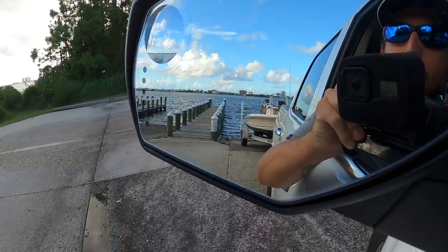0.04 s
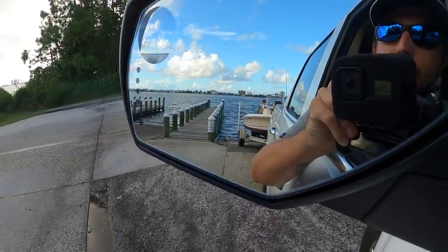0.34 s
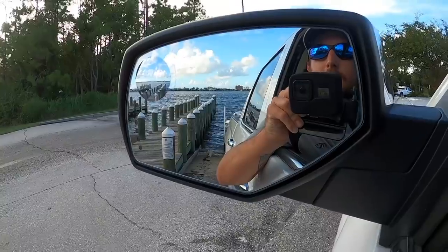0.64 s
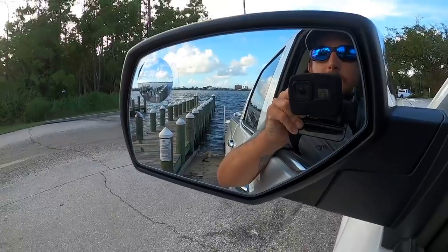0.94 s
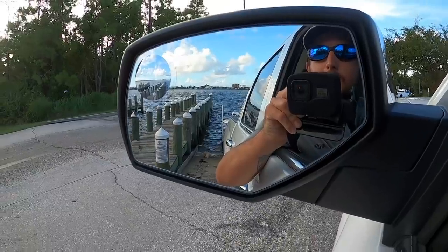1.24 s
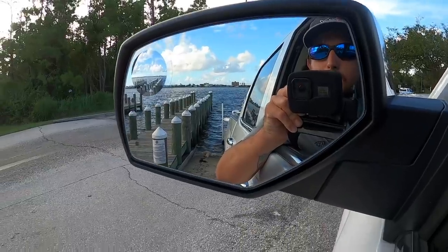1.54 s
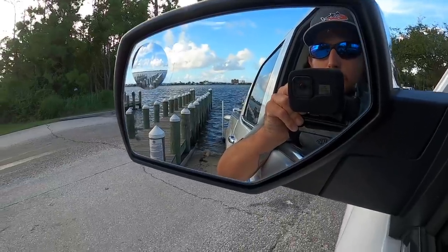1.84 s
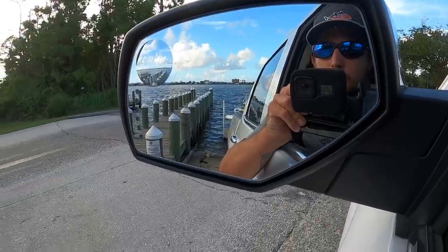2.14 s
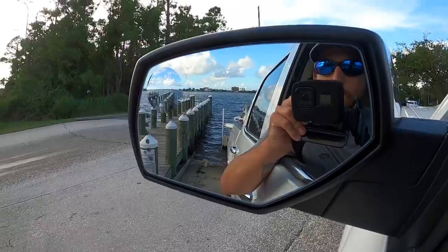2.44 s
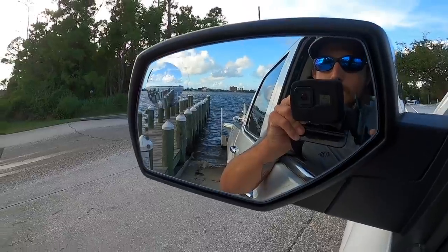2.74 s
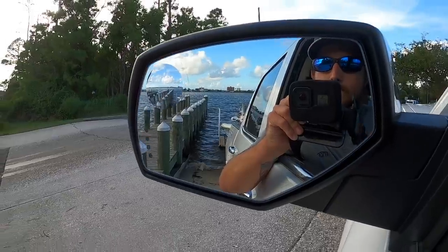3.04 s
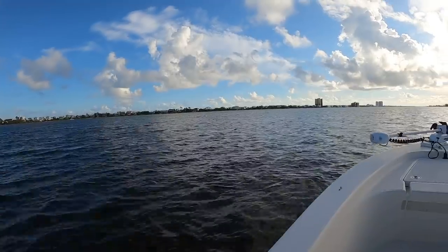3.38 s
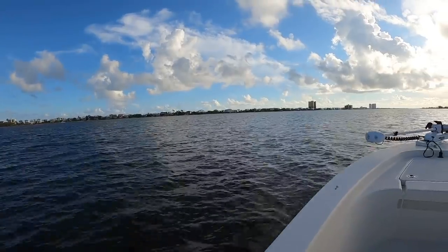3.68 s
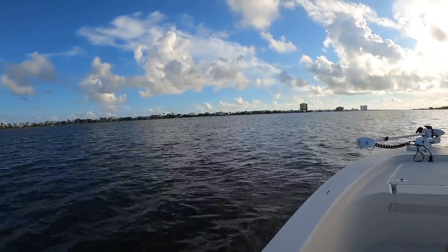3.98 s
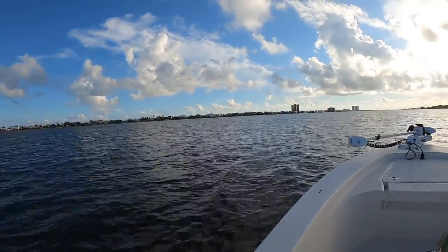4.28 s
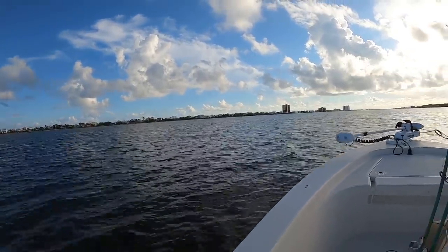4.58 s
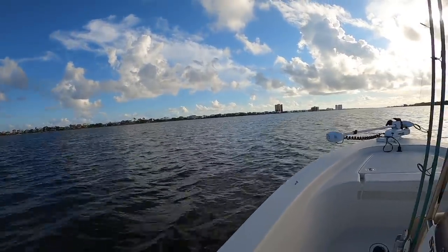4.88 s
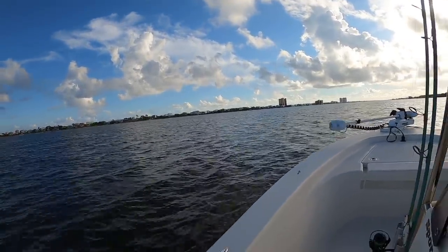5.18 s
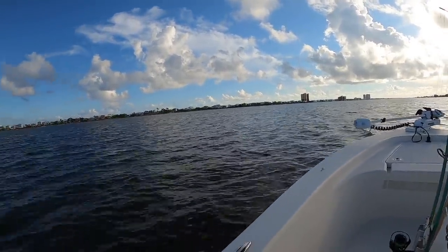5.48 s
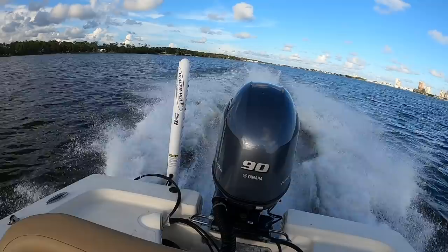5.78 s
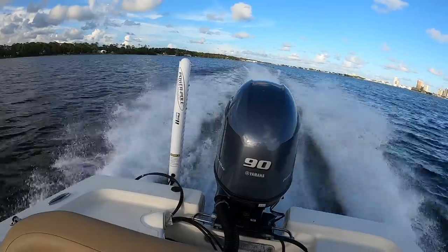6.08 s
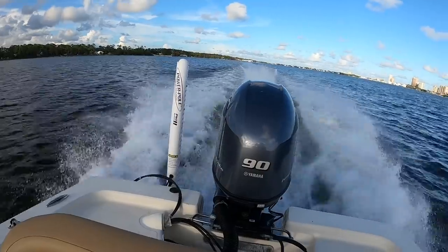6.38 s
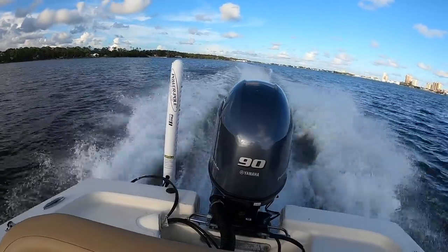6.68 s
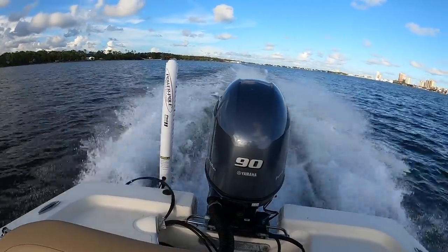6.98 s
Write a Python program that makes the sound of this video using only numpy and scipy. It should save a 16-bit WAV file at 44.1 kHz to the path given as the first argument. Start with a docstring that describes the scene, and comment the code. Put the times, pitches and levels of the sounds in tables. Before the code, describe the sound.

A pickup idles with a low rumble and faint hiss on a boat ramp, while grit crunches and small stones pop under a tyre. A sharp, loud knock hits the microphone housing. After a brief silence, a much louder outboard motor drones at full speed, heard from on board over hull rumble and rushing water, with a few ticks of loose gear. Near the end the engine and spray turn brighter.

```python
"""Boat ramp and outboard

A pickup idles on a boat ramp, grit crunching under a tyre, until a knock rings the microphone housing
and makes the limiter duck. After a short silence a boat runs flat out, heard facing the bow, then the
stern. A four-cylinder four-stroke outboard and its three-blade propeller drone in harmonics of their
shaft rates, over the broadband noise of hull, wake and spray and a few ticks of loose gear."""
import sys
import numpy as np
from scipy import signal
from scipy.fft import rfft, irfft, next_fast_len
from scipy.io import wavfile
from scipy.ndimage import uniform_filter1d, minimum_filter1d

SR = 44100
rng = np.random.default_rng(int(sys.argv[2]) if len(sys.argv) > 2 else 0)


def transcribe(u):
    """Save the signal u as a 16-bit wav file named by the first command-line argument.

    u: samples, shape (n,) or (channels, n), limited to [-1, 1]; the rate is SR.
    q: integer samples, one column per channel.
    """
    v = np.clip(np.atleast_2d(u).T, -1, 1)
    q = np.round(v * 32767).astype(np.int16)
    wavfile.write(sys.argv[1], SR, q)


N = 314212
TIME = np.arange(N) / SR
RAMP_END_S, BOAT_IN_S, BOAT_FULL_S, STERN_S = 3.236, 3.368, 3.444, 5.818

# Outboard harmonics: multiple of the two-turn cycle rate
ENGINE_ORDERS = (4, 6, 7, 8, 14, 15, 20, 21, 22, 23, 24, 26, 27, 28, 29, 30, 32, 33, 35, 37, 38, 40, 41, 42,
                 44, 45, 47, 60, 64, 72, 80, 90, 94, 101)
# The same harmonics facing the bow, and facing the stern: level_db
ENGINE_BOW_DB = (-16, -40, -31.5, -30.5, -44.5, -50, -52.5, -60, -48.5, -56.5, -48.5, -51, -54.5, -51, -66,
                 -62, -55, -61, -63, -59, -60.5, -66.5, -59, -59, -60, -61, -70, -60.5, -67, -75.5, -74,
                 -71.5, -84, -81)
ENGINE_STERN_DB = (-16, -30, -43.5, -26.5, -44.5, -43, -56, -46, -49.5, -43.5, -42, -44.5, -51, -47, -53,
                   -54, -50, -46, -50.5, -44, -47.5, -49, -50.5, -57, -48.5, -47.5, -52, -64, -51, -58, -67,
                   -54, -64, -65)
# Propeller harmonics: multiple of the blade rate, bow_level_db, stern_level_db
BLADE_HARMONICS = [(1, -24.5, -19.5), (2, -27, -24.5), (3, -22.5, -22), (4, -41, -39)]
# Valve-gear spectrum: frequency_hz, relative_density_db
CLATTER_SPECTRUM = [(300, -18), (600, -2), (1200, -1.5), (2000, -18), (3000, -23), (4000, -35.5)]

# Pickup exhaust partials: multiple of the boom pitch, relative_level_db
IDLE_PARTIALS = [(.5, -14), (1, -1), (1.5, -9)]
# Spectra of the pickup's rumble and engine-bay hiss: frequency_hz, relative_density_db
RUMBLE_SPECTRUM = [(15, -8.5), (30, 2.5), (70, 1.5), (110, -6.5), (160, -11.5), (220, -10), (350, -14),
                   (480, -24.5), (900, -28.5)]
HISS_SPECTRUM = [(250, -20), (450, -4.5), (800, -8.5), (1050, -4.5), (1600, -7), (2100, -10.5), (3200, -14),
                 (5200, -21.5), (6300, -27), (8500, -32.5), (11000, -37.5), (15000, -66)]
# Envelope of the engine-bay hiss: time_s, level_db
HISS_ENVELOPE = [(0, -45), (.2, -49.5), (.8, -46), (1.15, -48), (2.15, -46), (2.4, -43.5), (2.8, -45),
                 (3.2, -49.5)]
# Left-right likeness of the rumble and hiss: frequency_hz, correlation
RAMP_CORRELATION = [(60, 0.96), (200, .98), (500, 0.96), (1100, 0.91), (2700, 0.71), (8000, 0.23)]

# Two bumps and a sharp knock on the microphone housing: start_s, relative_level_db, tilt_db_per_octave
KNOCKS = [(.79, -62, -3), (.927, -55, -9.5), (2.8763, -2.5, -0.5)]
# Resonances of the housing: pitch_hz, relative_level_db, t60_s
HOUSING_MODES = [(180, -4, 0.052), (310, -5, 0.029), (687, 0, 0.017), (1640, 2.5, 0.0058),
                 (2140, -1.5, 0.012), (2910, 2.5, .011), (4370, 3.5, 0.005), (6000, -3.5, .005),
                 (8760, -11, 0.0028), (11900, -18, 0.0034)]

# Patches of grit crushed by the tyre: peak_s, level_db, rise_s, fall_s
CRUNCHES = [(.41, -41.5, 0.25, 0.19), (.52, -39, 0.1, 0.3), (.93, -50, .1, 0.066), (1.785, -46, 0.094, .06),
            (2.45, -49, .2, .1)]
# Slips of the tread on fine sand: peak_s, level_db
SCRAPES = [(.545, -52), (0.674, -48)]
# Spectra of grit and sand: frequency_hz, relative_density_db
GRIT_SPECTRUM = [(250, -15), (480, 4.5), (1000, -1.5), (2000, -2), (3200, -11.5), (5000, -21), (9000, -38),
                 (15000, -51.5)]
SAND_SPECTRUM = [(2000, -10), (5000, -2.5), (7500, -0.5), (10000, -5.5), (14000, -22)]
# Stones popping under the tyre: start_s, relative_level_db, tilt_db_per_octave
STONE_POPS = [(.2415, -36.5, -5.5), (.4035, -35, 4), (.417, -34.5, 3.5), (.459, -25.5, 0.5),
              (.4905, -24.5, -1), (.5232, -27.5, -3.5), (.556, -34, 3), (.585, -37, -5), (.648, -40, 0),
              (.668, -44, 12), (.679, -46, 11), (.9164, -39.5, 4), (2.3936, -40, -5), (2.7093, -39, 0)]
# Resonances of stone against stone: pitch_hz, relative_level_db, t60_s
STONE_MODES = [(794, -9, 0.036), (1030, -1.5, 0.033), (1430, 0, 0.021), (1770, -1.5, 0.026),
               (2280, -1.5, .022), (2750, 1, 0.016), (3570, -2.5, 0.01), (5400, -21, 0.013),
               (7550, -28, .014)]

# Spectra of hull rumble and of the wash at bow and stern: frequency_hz, relative_density_db
HULL_SPECTRUM = [(12, -23), (28, 3.5), (60, 1), (120, -0.5), (230, -2.5), (330, -2), (420, -4.5),
                 (520, -10.5), (640, -29), (1000, -38.5)]
BOW_SPECTRUM = [(300, -18), (540, 0.5), (700, -3), (950, -9), (1350, -11.5), (1700, -17.5), (2400, -21),
                (3200, -27), (4500, -33), (6300, -39), (7500, -43.5), (10000, -50), (11500, -57.5),
                (14500, -85.5)]
STERN_SPECTRUM = [(400, -21), (590, -5.5), (720, -1), (1200, -4), (1550, -10), (1950, -10), (2700, -13.5),
                  (3150, -14), (4500, -22), (6000, -31), (7700, -36.5), (10200, -34.5), (11300, -44.5),
                  (14500, -44.5)]
# Loose gear ticking on deck: start_s, relative_level_db, tilt_db_per_octave
GEAR_TICKS = [(4.7672, -22, -0.5), (5.2068, -30, -0.5), (5.6325, -32.5, 2), (5.7472, -25.5, -1)]
# Resonances of the gear: pitch_hz, relative_level_db, t60_s
GEAR_MODES = [(1860, 0, .014), (2500, 2, 0.015), (3240, -1, 0.011), (4600, -4.5, .012), (5270, -6.5, 0.009),
              (8200, -16.5, 0.0073), (11500, -24, .006)]


def outboard(cycles, astern):
    """Periodic forcing: firing, blade passage and valve clatter repeat at rates locked to the crank."""
    blades_per_crank_turn = 3 * 13 / 28  # three blades, geared down
    firing_harmonics = zip(ENGINE_ORDERS, ENGINE_BOW_DB, ENGINE_STERN_DB)
    engine = harmonics(cycles, firing_harmonics, astern, flutter_db=.7, jitter_rad=.017)
    blade_passes = 2 * blades_per_crank_turn * cycles
    propeller = harmonics(blade_passes, BLADE_HARMONICS, astern, flutter_db=.9, jitter_rad=.03)
    one_cycle = rng.standard_normal(900)
    repeated = np.interp(cycles % 1, np.linspace(0, 1, len(one_cycle)), one_cycle)
    clatter = from_db(-46.5 + 4.6 * astern + 1.3 * drift(14)) * colour(repeated, CLATTER_SPECTRUM)
    return engine + propeller + clatter


def engine_cycles(crank_rpm=5806, swing_rpm=22, wander_rpm=14, chop_hz=2.73, crest_s=4.39):
    """Frequency modulation: waves load and free the propeller; speed integrates to two-turn cycles."""
    chop = np.cos(2 * np.pi * chop_hz * (TIME - crest_s))
    rpm = crank_rpm + swing_rpm * chop + wander_rpm * drift(5.04)
    return np.cumsum(rpm / (2 * 60)) / SR


def pickup(idle_hz=112.7, sag_hz_per_s=0.807, growth_db_per_s=2.02, throb_hz=35):
    """Superposition: a swelling harmonic exhaust boom and a low throb add to rumble and bay hiss."""
    boom_hz = idle_hz - sag_hz_per_s * TIME
    boom_db = -53 + 13 * fade(0.35, .62) + growth_db_per_s * TIME  # rises as the tyre leaves the grit
    phase = 2 * np.pi * np.cumsum(boom_hz * (1 + 0.0055 * drift(3.9))) / SR
    boom = sum(from_db(boom_db + db + 2.2 * drift(5.6)) * np.sin(k * phase) for k, db in IDLE_PARTIALS)
    throb = from_db(-38.5 + 2.1 * drift(4.04)) * np.sin(2 * np.pi * throb_hz * TIME + 0.18 * drift(3))
    rumble = from_db(-35 + 0.86 * drift(3.3)) * colour(stereo_noise(RAMP_CORRELATION), RUMBLE_SPECTRUM)
    hiss_db = np.interp(TIME, *np.transpose(HISS_ENVELOPE))
    hiss = from_db(hiss_db + 0.82 * drift(8.7)) * colour(stereo_noise(RAMP_CORRELATION), HISS_SPECTRUM)
    return np.sqrt(2) * (boom + throb) + rumble + hiss * from_db([[1], [-1]])


def housing_knocks():
    """Impacts excite the housing's modes, earlier and louder at the nearer, right microphone."""
    ringing = struck(KNOCKS, HOUSING_MODES, crack_db=-12.5)
    return from_right(ringing, lag_s=0.00011) * from_db([[-1.8], [1.8]])


def tyre(rolling_grit_db=-57, rolling_sand_db=-74.5):
    """Granular noise: many tiny contacts merge as grit crushes and sand slips; single stones ring."""
    crushing = sum(from_db(db) * swell(s, rise_s, fall_s) for s, db, rise_s, fall_s in CRUNCHES)
    slipping = sum(from_db(db) * swell(s, rise_s=0.048, fall_s=0.033) for s, db in SCRAPES)
    centre = grains(per_s=4000, spread_db=2.5)
    sides = np.array([grains(per_s=4000, spread_db=2.5) for side in range(2)])
    contacts = centre + .5 * sides
    clumping = from_db(1.8 * drift(30))
    grit = (from_db(rolling_grit_db) + crushing) * colour(contacts, GRIT_SPECTRUM)
    sand = (from_db(rolling_sand_db) + slipping) * colour(contacts, SAND_SPECTRUM)
    stones = from_db(-2) * struck(STONE_POPS, STONE_MODES, crack_db=-9)
    return clumping * (grit + sand) + stones


def water(astern, hull_db=-19.5, bow_treble_db=-52.5, stern_treble_db=-43):
    """Flow noise: the hull rumbles; spray is hiss and droplet impacts, louder and brighter astern."""
    rumble = from_db(hull_db + 1.3 * drift(5.5)) * colour(rng.standard_normal(N), HULL_SPECTRUM)
    spray = rms_one(rng.standard_normal(N) + 0.72 * grains(per_s=5500, spread_db=3.5))
    spray *= from_db(1.2 * drift(22))
    bow = from_db(bow_treble_db) * colour(spray, BOW_SPECTRUM, above_hz=3000)
    stern = from_db(stern_treble_db) * colour(spray, STERN_SPECTRUM, above_hz=3000)
    return rumble + (1 - astern) * bow + astern * stern


def loose_gear():
    """Damped free vibration: gear strikes the deck and rings briefly."""
    return from_db(-3) * struck(GEAR_TICKS, GEAR_MODES, crack_db=-8.5)


def harmonics(cycles, orders, astern, flutter_db, jitter_rad):
    """Fourier series of a shaft's motion; phase jitter grows with order and blurs high partials most."""
    tone = np.zeros(N)
    for k, bow_db, stern_db in orders:
        level_db = bow_db + astern * (stern_db - bow_db) + (flutter_db + k / 80) * drift(5)
        phase = 2 * np.pi * (k * cycles + rng.random()) + jitter_rad * k * drift(9.2)
        tone += from_db(level_db) * np.sin(phase)
    return np.sqrt(2) * tone


def struck(hits, modes, crack_db):
    """Modal response: each contact cracks and rings damped modes; a harder one favours the treble."""
    sound = np.zeros(N)
    age = np.arange(SR // 5) / SR
    hz, mode_db, t60 = np.transpose(modes)
    polarity = (-1) ** np.arange(len(hz))
    crack_band = signal.butter(2, [900, 7000], "band", fs=SR, output="sos")
    for start_s, db, tilt in hits:
        strength = from_db(db + mode_db + tilt * np.log2(hz / 2000) + rng.normal(0, 1, len(hz)))
        detuned_hz = hz * rng.normal(1, .02, len(hz))
        ring = np.sin(2 * np.pi * np.outer(age, detuned_hz)) * from_db(-60 * age[:, None] / t60)
        crack = signal.sosfilt(crack_band, rng.standard_normal(len(age))) * from_db(-60 * age / .008)
        impact = ring @ (strength * polarity) + from_db(db + crack_db + 2 * tilt) * crack
        sound[round(start_s * SR):][:len(age)] += impact
    return sound


def grains(per_s, spread_db):
    """Shot noise: clicks at random moments, mostly small and a few large."""
    sizes = from_db(spread_db * np.minimum(rng.exponential(1, N), 4)) * rng.choice([-1, 1], N)
    return rms_one(sizes * (rng.random(N) < per_s / SR))


def stereo_noise(correlation):
    """Partial coherence: mid and side noise mix so that left and right agree most in the bass."""
    size = next_fast_len(N)
    alike = np.clip(at_hz(correlation, np.arange(size // 2 + 1) * SR / size), -1, 1)
    mid, side = rfft(rng.standard_normal((2, size)))
    return irfft(np.sqrt(1 + alike) * mid + np.sqrt(1 - alike) * side * [[1], [-1]], size)[:, :N]


def colour(x, spectrum, above_hz=0):
    """Linear filtering to a spectrum that rolls off past its top; the part over above_hz has rms 1."""
    size = next_fast_len(N)
    hz = np.arange(size // 2 + 1) * SR / size
    shaped = rfft(x, size) * from_db(at_hz(spectrum, hz)) / np.maximum(hz / spectrum[-1][0], 1) ** 2
    band_energy = np.sum(abs(shaped[..., hz >= above_hz]) ** 2, axis=-1)
    band_rms = np.sqrt(2 * np.mean(band_energy)) / size
    return irfft(shaped, size)[..., :N] / band_rms


def from_right(x, lag_s):
    """Path difference: sound from the right reaches the left microphone later."""
    left, right = np.broadcast_to(x, (2, N))
    return np.array([np.interp(TIME - lag_s, TIME, left), right])


def limiter(x, ceiling_db, hold_s, release_db_per_s):
    """Automatic gain control: gain drops at once on a peak, holds, then recovers."""
    excess_db = np.maximum(20 * np.log10(abs(x).max(axis=0) + 1e-9) - ceiling_db, 0)
    half_hold = int(hold_s * SR / 2)
    held_db = -minimum_filter1d(-excess_db, 2 * half_hold + 1, origin=half_hold)
    release_db = release_db_per_s * TIME
    cut_db = np.maximum.accumulate(held_db + release_db) - release_db
    return x * from_db(uniform_filter1d(minimum_filter1d(-cut_db, size=89), size=45))


def drift(rate_hz):
    """Random modulation: low-passed noise of unit rms."""
    step, settling = 40, 2000  # audio samples per point, points of filter start-up
    pole = np.exp(-2 * np.pi * step * rate_hz / SR)
    noise = rng.standard_normal(N // step + settling + 2)
    slow = signal.lfilter([1], [1, -2 * pole, pole * pole], noise)[settling:]
    return np.interp(np.arange(N) / step, np.arange(len(slow)), rms_one(slow))


def swell(peak_s, rise_s, fall_s):
    """Exponential growth to 1, then decay, by a factor of ten in each given time."""
    return 10 ** -np.maximum((peak_s - TIME) / rise_s, (TIME - peak_s) / fall_s).clip(max=10)


def fade(start_s, end_s):
    """Linear rise from 0 to 1."""
    return np.clip((TIME - start_s) / max(end_s - start_s, 1e-3), 0, 1)


def at_hz(points, hz):
    """Interpolation on a logarithmic frequency axis."""
    point_hz, value = np.transpose(points)
    return np.interp(np.log(hz + 1e-3), np.log(point_hz), value)


def from_db(db):
    """Amplitude ratio of a level in decibels."""
    return 10 ** (np.asarray(db) / 20)


def rms_one(x):
    """Normalisation to unit rms."""
    return x / np.sqrt(np.mean(x ** 2) + 1e-20)


def scene():
    """Sound pressures add: the ramp in stereo, a short silence, then the boat in mono."""
    ramp = from_right(pickup() + tyre(), lag_s=.00005) + housing_knocks()
    ramp = limiter(ramp, ceiling_db=0.5, hold_s=0.065, release_db_per_s=193)
    astern = fade(STERN_S - .005, STERN_S + 0.0027)  # 0 facing the bow, 1 facing the stern
    boat = outboard(engine_cycles(), astern) + water(astern) + loose_gear()
    return ramp * (1 - fade(RAMP_END_S - .016, RAMP_END_S)) + boat * fade(BOAT_IN_S, BOAT_FULL_S) ** 1.6


def record(dry):
    """Band limiting: a steep low-pass filter removes the highest treble."""
    stopband_hz = 15700
    return signal.sosfilt(signal.cheby2(12, 70, stopband_hz, fs=SR, output="sos"), dry + 1e-18)


dry = scene()
out = record(dry)
transcribe(out)
```